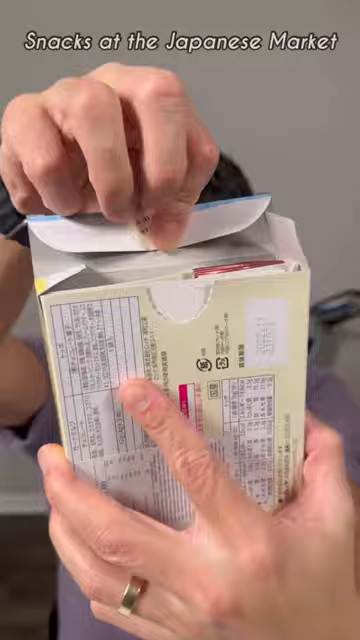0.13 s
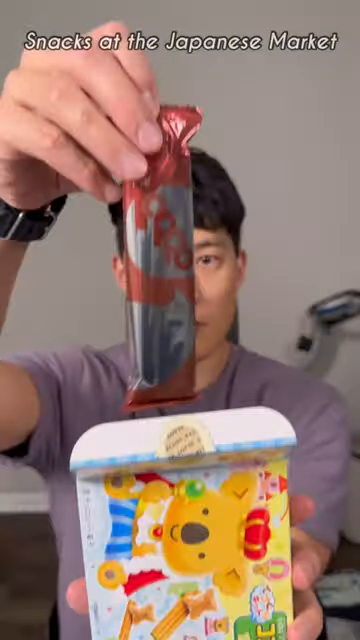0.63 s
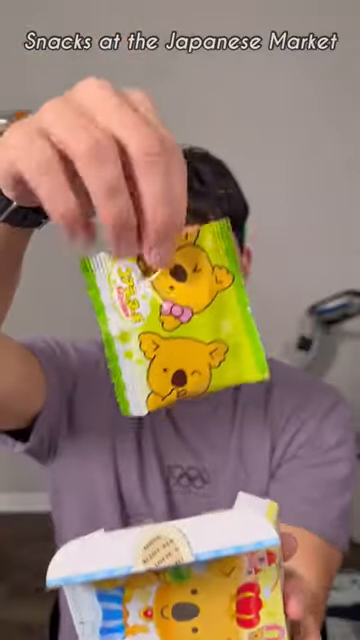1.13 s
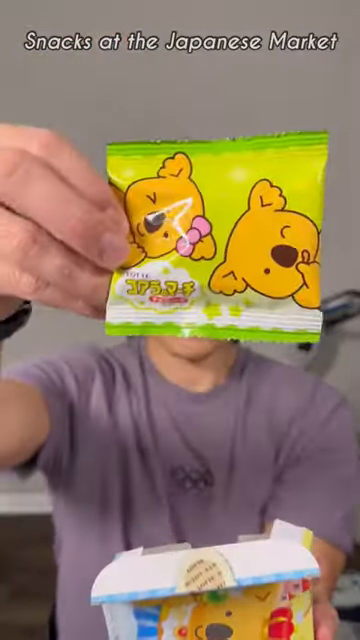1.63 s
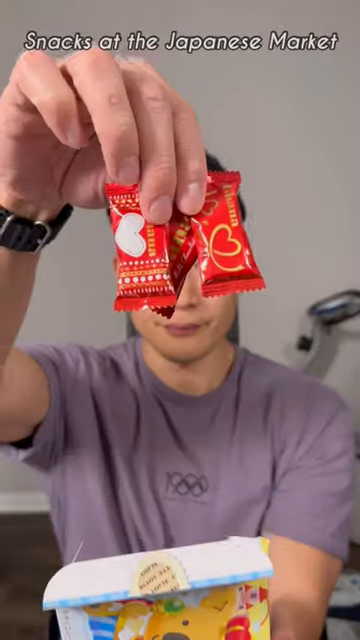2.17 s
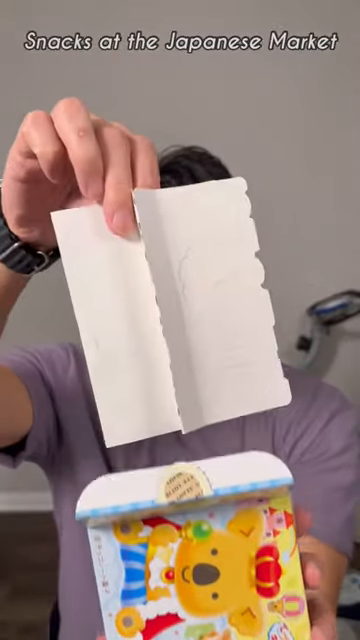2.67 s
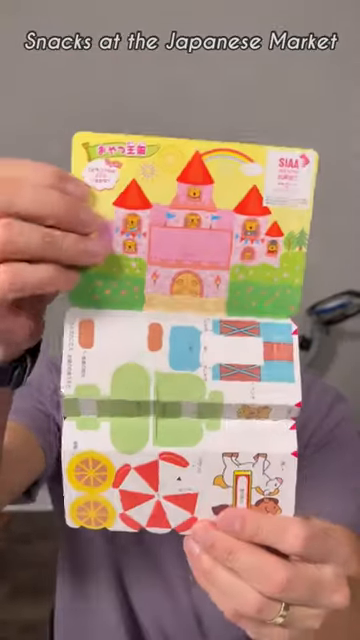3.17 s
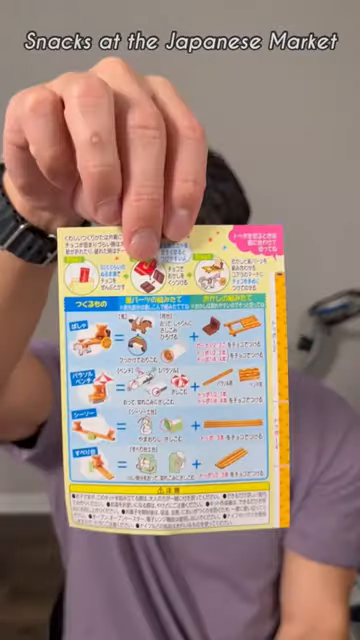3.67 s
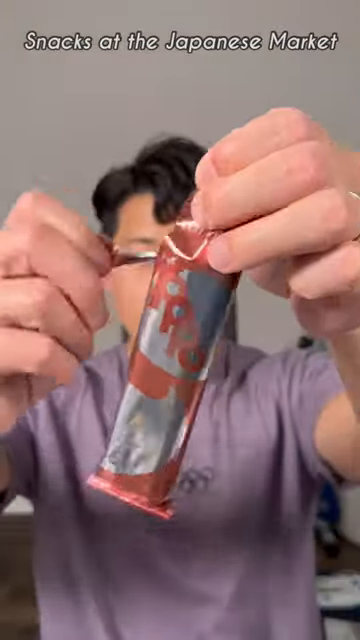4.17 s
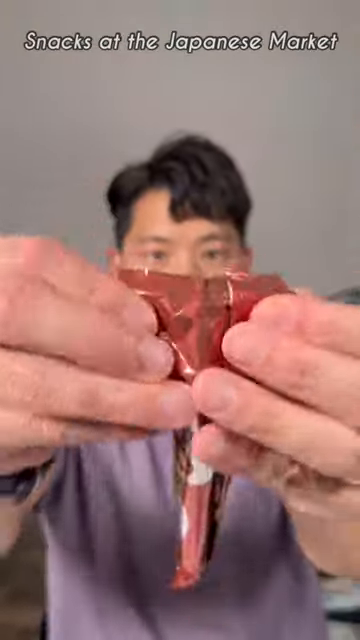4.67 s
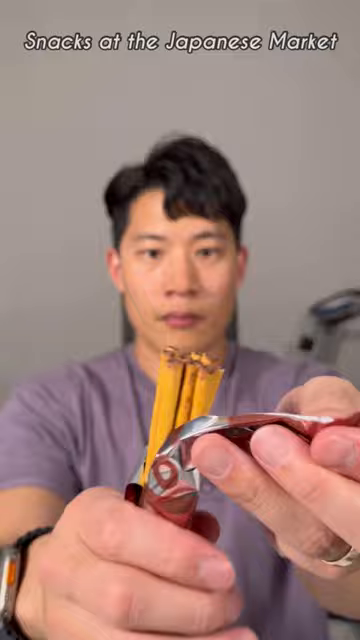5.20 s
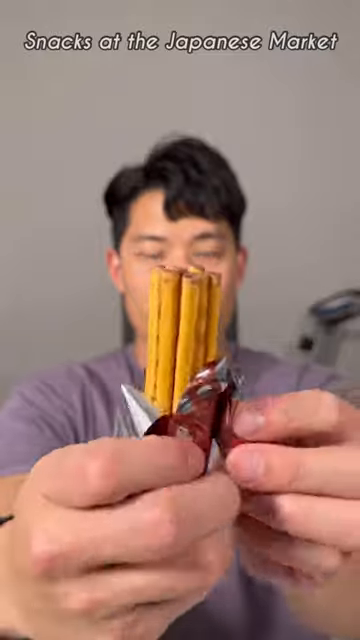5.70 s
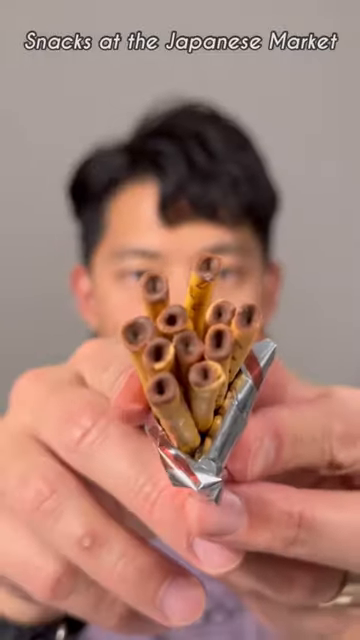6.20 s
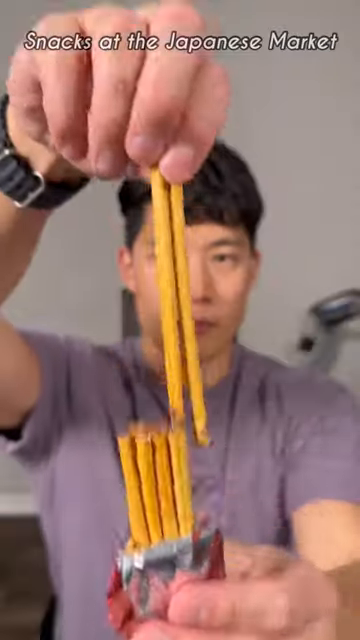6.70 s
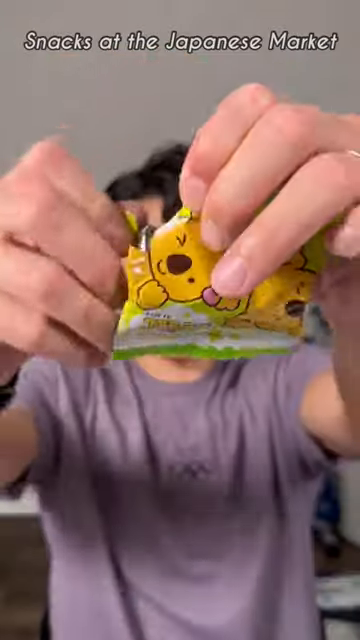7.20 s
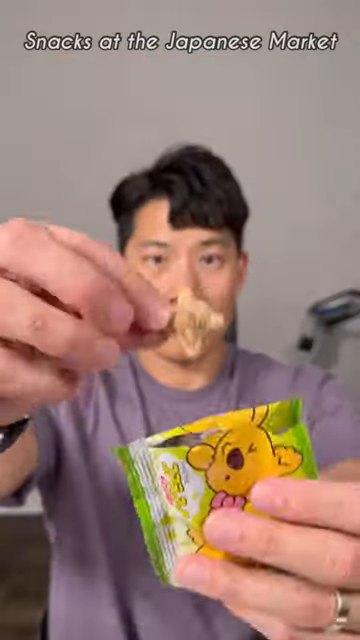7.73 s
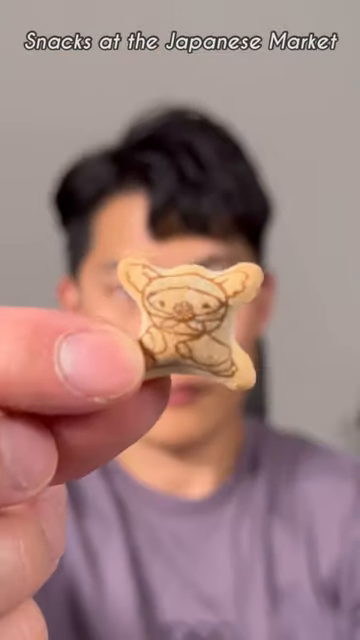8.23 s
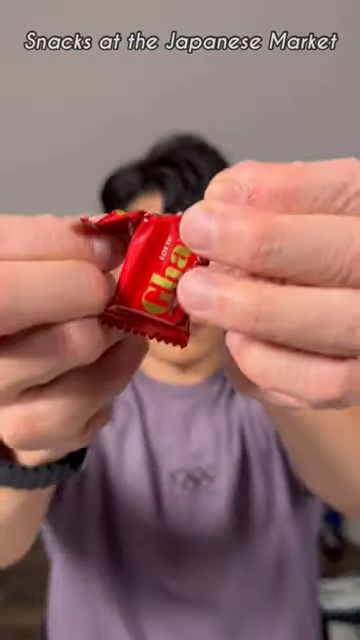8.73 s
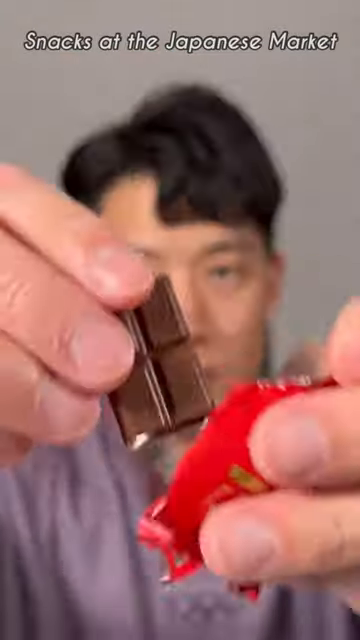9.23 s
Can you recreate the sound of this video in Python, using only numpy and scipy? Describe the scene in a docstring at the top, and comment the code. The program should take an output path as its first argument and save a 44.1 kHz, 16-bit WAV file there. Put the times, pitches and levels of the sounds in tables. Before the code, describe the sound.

Close, dry stereo handling in a furnished room, with soft low ventilation air and a faint wavering hum throughout. At 0-0.3 s a card box scrapes open, with one sharp crack and a dull knock at about 0.1 s. A few film ticks follow near 0.6 s, then mostly faint rustle and isolated clicks until 2.2 s. Card rubs softly with a boxy tone around 2.3-2.6 s, then near quiet. A hard snap at 3.9 s begins vigorous foil crackling and tearing, densest at 4.4-4.9 s. Lighter crinkles continue from 5 to 6 s, fading to sparse ticks. A second packet crackles and rips at 7.1-7.65 s, with a dull knock near 7.45, then quiet. A small wrapper bursts into very bright, loud snaps at 8.6-8.9 s, leaving a faint thin ring, then small ticks after 9.1 s. Shots change abruptly with tiny fade-ins.

```python
"""A slide of card and a sharp crackle come first: hands open a card box, draw out foil packets and a
folded card, then tear the packets, close by in a furnished room; ventilation hums below.
Creases in the film snap through as noise bursts with ringing panels, over a rustle of hiss and tiny
clicks; card rustle also excites box modes, and box or bag knocks dully as it gives way.
Shots are joined by hard cuts, each shot after a cut fading in within a few hundredths of a second."""
import sys
import numpy as np
from scipy import signal
from scipy.fft import rfft, irfft, next_fast_len
from scipy.io import wavfile

SR = 44100
rng = np.random.default_rng(int(sys.argv[2]) if len(sys.argv) > 2 else 0)


def undo_db(level):
    """Turn decibels back into plain size, where 20 dB means ten times bigger."""
    steps = np.asarray(level, float) / 20
    return 10 ** steps


def output_pcm(signal):
    """Save a mono or channel-first signal as 16-bit PCM at the path in sys.argv[1].

    Samples are clipped to [-1, 1] before scaling.
    """
    pcm = np.clip(np.atleast_2d(signal).T, -1, 1) * 32767
    wavfile.write(sys.argv[1], SR, np.round(pcm).astype(np.int16))


N = 412776

# Colour of crackling film. Each row: frequency in Hz, relative spectral level in dB.
FILM_COLOUR = [(1200, -17), (2400, 1.5), (3500, 0.5), (4700, -2), (6200, 2.5), (8000, 3), (11000, -3),
               (15600, 0.5), (16300, -31.5)]
# Starts of the shots after the first, in seconds.
CUTS_S = [0.331, 0.997, 1.74, 2.781, 3.3578, 3.9342, 4.939, 5.822, 6.4673, 7.1062, 7.671, 8.018, 8.575,
          9.1604]
# Grips, pulls and tears of the hands. Each row: start in seconds, rise in seconds, hold in seconds,
# film rustle level in dB, card and packet body level in dB.
HAND_MOVES = [(0, 0.00078, 0.025, -32.5, -36.5), (0.07, 0.0099, 0.016, -26, -30),
              (0.122, 0.02, 0.055, -48, -39.5), (0.306, 0.028, .2, -55.5, -55.5),
              (0.553, 0.026, .005, -40.5, -52.5), (1.34, 0.154, 0.07, -68, -69),
              (1.979, 0.0095, .005, -52.5, -58), (2.264, 0.0073, 0.024, -39, -39),
              (2.309, 0.029, .07, -41.5, -43.5), (2.417, 0.026, 0.024, -40, -40.5),
              (2.487, 0.026, 0.079, -45, -47), (3.937, 0.047, .06, -45.5, -61),
              (4.011, 0.14, .005, -37, -40), (4.285, 0.0049, .005, -46, -43),
              (4.391, 0.011, 0.014, -36.5, -35.5), (4.48, 0.039, 0.032, -25, -32),
              (4.656, 0.05, .005, -35.5, -33), (4.8, 0.22, .05, -38, -51), (4.92, 0.035, 0.18, -51, -56),
              (5.13, 0.011, .1, -48, -57), (5.278, 0.0083, 0.11, -44, -49),
              (5.456, 0.014, .03, -35.5, -45.5), (5.528, 0.028, 0.1, -39, -44),
              (5.7, 0.06, .07, -36.5, -46), (5.8, 0.064, 0.18, -48.5, -56),
              (6.116, 0.014, 0.0081, -45, -52.5), (6.229, 0.051, .23, -61, -63.5),
              (6.452, 0.083, 0.067, -46, -61), (6.646, 0.0075, .005, -41, -46.5),
              (6.71, 0.1, 0.13, -52, -64.5), (6.977, 0.1, 0.053, -45.5, -60.5),
              (7.092, .025, .005, -48.5, -50), (7.17, 0.0089, 0.082, -36, -37.5),
              (7.32, 0.02, .005, -32.5, -36), (7.384, 0.068, 0.027, -31, -35),
              (7.587, 0.0086, .005, -42, -41), (7.642, 0.048, 0.032, -50.5, -53),
              (8.563, 0.037, 0.026, -33.5, -55.5), (8.677, 0.016, 0.043, -53, -63),
              (8.794, 0.0065, .005, -29.5, -41.5), (8.836, 0.011, 0.0064, -22.5, -30),
              (8.916, 0.042, .05, -49.5, -51.5), (9.138, 0.0044, .005, -56.5, -48.5),
              (9.161, 0.024, .02, -46.5, -50)]


def rms_one(x):
    """Scale to rms 1."""
    return x / np.sqrt(np.mean(x ** 2) + 1e-20)


def at_hz(points, hz):
    """Read a table on a log-frequency axis."""
    table_hz, values = np.transpose(points)
    return np.interp(np.log(hz + 1), np.log(table_hz), values)


def shaped(x, gain_at):
    """Multiply the spectrum by a function of frequency."""
    length = x.shape[-1]
    size = next_fast_len(length)
    gain = gain_at(np.fft.rfftfreq(size, 1 / SR))
    return irfft(rfft(x, size) * gain, size)[..., :length]


def drift(knots_per_s):
    """Slow chance: straight lines between normal random knots of spread 1."""
    knots = rng.standard_normal(2000)
    return np.interp(np.arange(N) / SR * knots_per_s, np.arange(2000), knots)


def peaks_db(peaks, hz):
    """Sum of resonance bumps in dB."""
    return sum(db / (1 + (2 * (hz - top_hz) / width_hz) ** 2) for top_hz, width_hz, db in peaks)


def spread(mid, side, colour):
    """Two unrelated noises mixed to a set left-right correlation at each frequency, opposed in the treble."""
    # Each row: frequency in Hz, left-right correlation.
    likeness = [(60, 0.96), (300, 0.97), (700, -0.39), (1400, 0.51), (5000, 0.058), (10200, -0.7),
                (13000, -.9)]

    def alike(hz):
        return np.clip(at_hz(likeness, hz), -1, 1)
    mid = shaped(mid, lambda hz: colour(hz) * np.sqrt(1 + alike(hz)))
    side = shaped(side, lambda hz: colour(hz) * np.sqrt(1 - alike(hz)))
    return np.array([mid + side, mid - side])


def ventilation(air_db=-51, waver_db=3.0, waver_hz=3.98):
    """Steady air noise, most alike left and right in the bass, duct resonances, wavering motor hum."""
    # Air noise. Each row: frequency in Hz, relative spectral level in dB.
    air_colour = [(20, -44.5), (45, -10), (120, -4.5), (168, -9.5), (295, -3.5), (480, -6.5), (600, -18),
                  (900, -13.5), (1500, -37.5), (2300, -26.5), (3200, -34), (4700, -33.5), (5600, -48.5),
                  (9500, -63.5), (11000, -91)]
    # Duct resonances. Each row: frequency in Hz, width in Hz, height in dB.
    duct = [(208, 11, 11.5), (1246, 180, 18), (1734, 330, 17)]
    # Motor hum. Each row: mean frequency in Hz, rms level in dB about which it wavers.
    motor = [(59, -64), (119.5, -63.5)]

    def colour(hz):
        return undo_db(at_hz(air_colour, hz) + peaks_db(duct, hz))
    air = spread(*rng.standard_normal((2, N)), colour)
    hum = 0
    for hz, db in motor:
        phase = 2 * np.pi * np.cumsum(hz + waver_hz * drift(6.5)) / SR
        hum = hum + np.sqrt(2) * undo_db(db + waver_db * drift(1.9)) * np.sin(phase)
    return undo_db(air_db) * rms_one(air) + hum


def room(x, first_echo_s=0.0006):
    """Octave bands of dying noise, spread left and right; a cut ends the tail of the shot before it."""
    # Each row: frequency in Hz, decay time to -60 dB in seconds.
    t60_s = [(1000, 0.05), (6000, 0.64), (12000, 0.13)]
    t, echoes = np.arange(SR // 2) / SR, 0
    for hz in 250 * 2. ** np.arange(7):
        edges_hz = [hz / np.sqrt(2), min(hz * np.sqrt(2), 19000)]
        band = signal.butter(2, edges_hz, "band", fs=SR, output="sos")
        noise = signal.sosfilt(band, rng.standard_normal((2, len(t))))
        echoes = echoes + noise * undo_db(-60 * t / at_hz(t60_s, hz))
    echoes = spread(*echoes, np.ones_like) * np.clip(t / first_echo_s - 1, 0, 1)
    echoes = echoes / np.sqrt(np.sum(echoes ** 2) / 2)
    shots = np.split(x, np.round(np.array(CUTS_S) * SR).astype(int))
    return np.hstack([signal.fftconvolve(shot[None], echoes, axes=1)[:, :len(shot)] for shot in shots])


def tails(fade_db_per_s=129, top_hz=7840):
    """Smooth, film-coloured hiss dying away, as room echo of an earlier crackle opening a shot."""
    # Each row: start in seconds, level in dB.
    starts = [(.331, -42), (.998, -47.5), (8.02, -51.5)]
    t = np.arange(N) / SR
    gain = sum((t >= s) * undo_db(db - fade_db_per_s * np.maximum(t - s, 0)) for s, db in starts)
    hiss = spread(*rng.standard_normal((2, N)),
                  lambda hz: undo_db(at_hz(FILM_COLOUR, hz)) / (1 + (hz / top_hz) ** 4))
    return gain * rms_one(hiss)


def faint_ring():
    """Something hard nearby rings after the loudest tear: one thin dying tone that ends with its shot."""
    # Start in seconds, frequency in Hz, peak level in dB, decay time to -60 dB in seconds.
    tone = (8.86, 2110, -46, 1.2)
    start_s, hz, level_db, t60_s = tone
    out = np.zeros(N)
    t = np.arange(round((CUTS_S[-1] - start_s) * SR)) / SR
    out[round(start_s * SR):][:len(t)] = undo_db(level_db - 60 * t / t60_s) * np.sin(2 * np.pi * hz * t)
    return out


def thumps(cycles=4.7):
    """A box or bag that gives way knocks dully: octaves of noise that each last a few cycles, so lows linger."""
    # Each row: start in seconds, level of the lowest octave in dB, tilt in dB per octave.
    knocks = [(.119, -38.5, 6), (7.454, -40.5, 3.5)]
    start_s, level_db, tilt_db = np.transpose(knocks)[:, :, None]
    t, knock = np.arange(8192) / SR, 0
    for octave in range(4):
        hz = 100 * 2 ** octave
        noise = rng.standard_normal((len(start_s), 8192))
        band = shaped(noise, lambda f: np.exp(-2 * np.log2(f / hz + 1e-9) ** 2))
        life = t * hz / cycles * np.e
        knock = knock + undo_db(level_db + octave * tilt_db) * rms_one(band) * life * np.exp(1 - life)
    out = np.zeros(N)
    np.add.at(out, np.round(start_s * SR).astype(int) + np.arange(8192), knock)
    return out


def handling(move_db, fade_db_per_s, rest_db, rise_db=14):
    """Each move rises, holds and fades within its shot; powers add over the faint sound of mere holding."""
    start, rise, hold = np.transpose(HAND_MOVES)[:3, :, None]
    t = np.arange(N // 40 + 2) * 40 / SR     # every 40 samples
    rising_db = np.minimum(rise_db * ((t - start) / np.maximum(rise, 1e-3) - 1), 0)
    fading_db = fade_db_per_s * np.maximum(t - start - rise - hold, 0)
    same_shot = np.searchsorted(CUTS_S, t) == np.searchsorted(CUTS_S, start + rise)
    moves_power = same_shot * undo_db(move_db[:, None] + rising_db - fading_db) ** 2
    power = np.sum(moves_power, axis=0) + undo_db(rest_db) ** 2
    return np.interp(np.arange(N) / SR, t, np.sqrt(power))


def creases(low_hz, high_hz, born, size_db, cycles, click_db):
    """Every small crease clicks and rings briefly at one of ten pitches."""
    size = undo_db(size_db * np.minimum(rng.exponential(1, N), 3))
    clicks = born * size * rng.choice([-1, 1], N)
    dealt, out = rng.integers(0, 10, N), undo_db(click_db) * clicks
    for k, hz in enumerate(np.geomspace(low_hz, high_hz, 10)):
        r, w = np.exp(-hz / (cycles * SR)), 2 * np.pi * hz / SR
        resonator = [np.sin(w) * np.sqrt(1 - r)], [1, -2 * r * np.cos(w), r * r]
        out = out + signal.lfilter(*resonator, clicks * (dealt == k) + 1e-18)
    return out


def rustle(per_s=600.0, clump_db=6.5, flicker_db=3.5, card_flicker_db=2.5,
           film_share=0.77, card_share=0.26, box_wander_db=6):
    """Sliding is smooth hiss, crumpling a swarm of small creases in clumps; card slides, film mostly creases."""
    # Spans in which card slides. Each row: start in seconds, end in seconds.
    card_spans = [(0, 0.71), (2.248, 3.1)]
    # Card and packet bodies. Each row: frequency in Hz, relative spectral level in dB.
    body_colour = [(100, -23.5), (300, -2.5), (600, -5), (900, -3.5), (1250, -0.5), (1800, -1.5),
                   (2500, -8.5), (5000, -21)]
    # Modes of the box under the card. Each row: frequency in Hz, width in Hz, relative level in dB.
    box_modes = [(907, 210, -7), (1170, 85, -15.5), (1420, 320, -20), (2450, 180, -9.5), (2770, 70, -12)]
    t = np.arange(N) / SR
    film_db, body_db = np.transpose(HAND_MOVES)[3:]
    film_gain = handling(film_db, fade_db_per_s=212.5, rest_db=-84)
    body_gain = handling(body_db, fade_db_per_s=206, rest_db=-66)
    on_card = sum((t > start) & (t < end) for start, end in card_spans)
    crease_share = np.clip(np.where(on_card, card_share, film_share), 0, 1)     # of power
    born = rng.random(N) < per_s * undo_db(clump_db * drift(45.0)) / SR
    film = creases(2100, 14600, born, size_db=7.0, cycles=2.1, click_db=1.5)
    body = creases(520, 3020, born, size_db=6.5, cycles=0.61, click_db=-18.5)
    layers = 0
    for colour, gain, grains in ((FILM_COLOUR, film_gain, film), (body_colour, body_gain, body)):
        flicker = undo_db(np.where(on_card, card_flicker_db, flicker_db) * drift(60.0))
        sliding = rng.standard_normal(N) * flicker
        sliding, grains = [rms_one(shaped(x, lambda hz: undo_db(at_hz(colour, hz)))) for x in (sliding, grains)]
        layers = layers + gain * (np.sqrt(crease_share) * grains + np.sqrt(1 - crease_share) * sliding)
    # each mode comes and goes as the card slides along
    boxed = 0
    for top_hz, width_hz, db in box_modes:
        mode = shaped(layers * on_card, lambda hz: undo_db(10.5) / (1 + 2j * (hz - top_hz) / width_hz))
        boxed = boxed + undo_db(db + box_wander_db * drift(25.0)) * mode
    return layers * undo_db(-3.0 * on_card) + boxed


def snaps(crack_s=0.00063, octaves=0.98, skirt_db=-8.5, crack_trim_db=-0.5, ring_cycles=3.0, ring_trim_db=2.5,
          settle_db=-21.0, settle_s=0.0033, upper_db=-3.0):
    """A crease flips: a brief crack, loudest around its pitch, then the panel beside it rings a few cycles."""
    # Single creases that stand out, loud or faint. Each row: start in seconds, crack peak in dB before
    # trim, crack pitch in Hz, panel ring pitch in Hz, panel ring level in dB before trim.
    flips = [(.1162, -4.5, 4200, 990, -23.5), (.1775, -23.5, 5600, 930, -33),
             (0.185, -14.5, 4100, 830, -34.5), (0.2125, -34, 5200, 2000, -35.5),
             (.293, -40.5, 3500, 2100, -40.5), (.367, -34.5, 5800, 2500, -40),
             (0.5631, -24.5, 4100, 1130, -28), (.579, -15, 5640, 2340, -28), (0.7858, -36, 3680, 2240, -38),
             (0.965, -40, 4270, 1500, -62), (1.31, -37, 3120, 1470, -61), (1.3355, -28.5, 6000, 1830, -54),
             (1.697, -32.5, 3620, 1180, -38.5), (1.8732, -40.5, 3470, 1550, -50),
             (1.965, -38.5, 4040, 2320, -44), (1.9976, -33, 3940, 1780, -48),
             (2.175, -31, 3820, 2020, -38.5), (2.274, -39, 4000, 970, -29), (2.604, -30.5, 5400, 2280, -35),
             (2.9085, -30.5, 3280, 1620, -34.5), (3.9367, -6, 6460, 1220, -34),
             (4.0198, -26, 3250, 2150, -26), (4.065, -17.5, 5080, 2500, -44.5),
             (4.0892, -8.5, 6070, 2330, -35.5), (4.14, -16.5, 4250, 2280, -20),
             (4.1562, -15, 4600, 1210, -23.5), (4.2986, -15.5, 6170, 1910, -34.5),
             (4.3758, -22, 5300, 1850, -39.5), (4.401, -12.5, 5870, 2260, -33.5),
             (4.4184, -15, 4270, 965, -32), (4.437, -13.5, 4540, 1760, -28),
             (4.4784, -18.5, 7000, 1120, -42), (4.4867, -5, 4080, 2240, -23.5),
             (4.5351, -24.5, 5320, 1720, -18), (4.5574, -27, 4390, 1210, -15),
             (4.5667, -8.5, 3600, 2000, -17), (4.5954, -38.5, 4280, 1040, -23),
             (4.637, -28, 4380, 1170, -28), (4.6632, -16, 3990, 2010, -26.5), (4.68, -5, 3700, 1170, -19.5),
             (4.6945, -7, 3440, 1340, -33), (4.709, -23, 3580, 2180, -20.5), (4.7156, -11, 4240, 1600, -21),
             (4.7527, -18.5, 6300, 1700, -31.5), (4.7667, -6.5, 3980, 1600, -22),
             (4.793, -9.5, 3450, 2440, -49.5), (4.8793, -9.5, 4620, 1330, -11.5),
             (4.971, -26, 3580, 1540, -29.5), (5.0336, -27.5, 5830, 1860, -46),
             (5.048, -20, 5900, 960, -40), (5.0662, -21, 5230, 2280, -57), (5.1646, -25.5, 5620, 450, -62),
             (5.191, -21, 5930, 2480, -41), (5.271, -22, 6300, 450, -59), (5.3055, -16.5, 4600, 1970, -29),
             (5.337, -17, 5000, 890, -38), (5.3457, -28, 4740, 2050, -47), (5.375, -29, 5000, 1500, -37),
             (5.479, -19.5, 4710, 2350, -48), (5.516, -23.5, 4680, 2390, -41),
             (5.5452, -21, 6900, 2500, -47), (5.5535, -22, 4830, 1890, -31.5),
             (5.579, -16, 3700, 2460, -26), (5.6086, -12.5, 4060, 740, -36.5),
             (5.6359, -13.5, 5900, 2370, -41), (5.6937, -18.5, 6050, 2200, -40),
             (5.7035, -22, 4870, 2380, -46), (5.735, -24, 3400, 1500, -31), (5.7637, -23, 5900, 2500, -36),
             (5.771, -30.5, 4500, 2320, -29), (5.7818, -22.5, 3800, 2350, -30),
             (5.7964, -36.5, 3500, 2330, -23.5), (5.8136, -22.5, 3500, 2320, -26.5),
             (5.862, -20, 5300, 1600, -36), (5.9122, -18.5, 8380, 2170, -54.5),
             (5.9288, -24.5, 8000, 2450, -38), (5.9664, -22.5, 3100, 2350, -33.5),
             (6.128, -27, 5400, 440, -62), (6.1545, -23, 6540, 2390, -58), (6.74, -24.5, 4300, 1850, -41),
             (6.82, -33, 6100, 2000, -49), (6.849, -21.5, 5170, 447, -63), (6.9403, -27, 4570, 2260, -53),
             (7.036, -26, 4360, 450, -56), (7.054, -21, 7600, 2350, -56), (7.1293, -16.5, 4350, 2460, -24),
             (7.1825, -13, 4230, 450, -29.5), (7.2368, -23, 4000, 2390, -34.5),
             (7.2668, -11, 4980, 1560, -24), (7.2926, -15.5, 4970, 2350, -31),
             (7.3442, -18, 4270, 2280, -24), (7.3486, -9, 5620, 553, -34.5),
             (7.406, -11.5, 6630, 1020, -30), (7.4184, -21, 5500, 2500, -42),
             (7.4325, -27, 6000, 2400, -31.5), (7.4363, -18, 5900, 2280, -33.5),
             (7.443, -8, 6080, 2170, -28), (7.4555, -11, 5910, 900, -25.5), (7.4708, -17, 5800, 2730, -33),
             (7.4832, -7, 5870, 1950, -27), (7.5252, -30, 3900, 1420, -35), (7.5914, -12, 5430, 1740, -39),
             (7.5982, -15, 6070, 1010, -45), (7.625, -22.5, 3640, 2240, -28.5),
             (7.648, -20.5, 5830, 2240, -31), (7.7325, -20, 6400, 1320, -37),
             (7.9774, -45, 2620, 1890, -43.5), (8.619, -14.5, 6060, 2390, -45),
             (8.6294, -10.5, 5740, 1740, -29.5), (8.6401, -15.5, 5720, 1340, -29.5),
             (8.6652, -19, 5960, 2280, -40), (8.675, -4, 5200, 2430, -22), (8.71, -20, 5020, 2350, -35),
             (8.776, -19, 6300, 2300, -71), (8.7998, -8.5, 5030, 2390, -20), (8.8056, -7, 5400, 2370, -27),
             (8.82, -19, 5000, 2240, -27), (8.825, -16, 5750, 1790, -25), (8.8395, -2, 5480, 2280, -23),
             (8.8505, -3, 5500, 2290, -25.5), (8.8578, -13, 6100, 2450, -22.5),
             (8.862, -4.5, 7020, 2450, -16), (8.8934, -24, 4530, 2345, -21),
             (8.8963, -3.5, 7170, 1186, -26.5), (8.9187, -8, 6170, 2290, -24.5),
             (8.996, -17.5, 6150, 2360, -31), (9.1396, -26.5, 3800, 2280, -29.5),
             (9.2285, -22, 3970, 2370, -30)]
    start_s, crack_db, crack_hz, ring_hz, ring_db = np.transpose(flips)[:, :, None]
    t = np.arange(1024) / SR
    attack = t / crack_s * np.exp(-2 * t / crack_s)
    # the film rustles a few milliseconds while it settles
    settling = undo_db(settle_db) * np.minimum(t / crack_s, 1) * np.exp(-t / settle_s)
    burst = rng.standard_normal((len(start_s), 1024)) * (attack + settling)

    def crack_colour(hz):
        off_pitch = np.minimum(np.log2(hz / crack_hz + 1e-9) ** 2 / octaves ** 2, 1)
        return undo_db(at_hz(FILM_COLOUR, hz) + skirt_db * off_pitch)
    crack = shaped(burst, crack_colour)
    crack = crack / np.abs(crack).max(axis=1, keepdims=True)
    swell = t * ring_hz / ring_cycles * np.e     # the panel takes about a cycle to get going
    upper_hz = ring_hz * rng.uniform(0.99, 1.96, (len(start_s), 1))     # unrelated mode of the same panel
    modes = np.sin(2 * np.pi * ring_hz * t) + undo_db(upper_db) * np.sin(2 * np.pi * upper_hz * t)
    ring = swell * np.exp(1 - swell) * modes
    out = np.zeros(N + 1024)
    np.add.at(out, np.round(start_s * SR).astype(int) + np.arange(1024),
              undo_db(crack_db + crack_trim_db) * crack + undo_db(ring_db + ring_trim_db) * ring)
    return out[:N]


def scene(sway_s=1.2e-5, snap_top_hz=13000, rustle_top_hz=5800, room_db=-10):
    """Close sound reaches two microphone ports with a phase shift that varies with frequency; a small
    time lag wanders between left and right, reaching higher in frequency for snaps than for rustle."""
    # Each row: frequency in Hz, phase lead of the left port in radians.
    port_lead = [(2200, 0), (4000, .45), (5500, -.5), (10000, -2.6), (12000, -3.1), (13500, -3.6),
                 (15400, -4.5)]
    sharp, soft = snaps(), thumps() + rustle() + faint_ring()
    # time derivative: a small multiple of it shifts the sound in time
    slope = sum(shaped(x, lambda hz: 2j * np.pi * hz / (1 + (hz / top_hz) ** 8))
                for x, top_hz in ((sharp, snap_top_hz), (soft, rustle_top_hz)))
    hands, shift = sharp + soft, sway_s * drift(30.0) * slope
    left = shaped(hands + shift, lambda hz: np.exp(.5j * at_hz(port_lead, hz)))
    right = shaped(hands - shift, lambda hz: np.exp(-.5j * at_hz(port_lead, hz)))
    return np.array([left, right]) + undo_db(room_db) * room(hands) + tails() + ventilation()


def top_cut(x):
    """Nothing passes above the cut-off."""
    return signal.sosfilt(signal.butter(12, 17150, fs=SR, output="sos"), x)


def record(dry, fade_in_s=0.022):
    """Each shot after a cut fades in from silence; then the highest peaks are rounded."""
    t = np.arange(N) / SR
    shot_start = np.array([-1.] + CUTS_S)[np.searchsorted(CUTS_S, t, side="right")]
    faded = dry * np.clip((t - shot_start) / fade_in_s, 0, 1)
    mix = np.tanh(faded * 1.096) / 1.078
    return top_cut(mix)


dry = scene()
out = record(dry)
output_pcm(out)
```